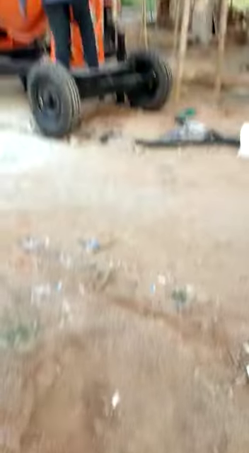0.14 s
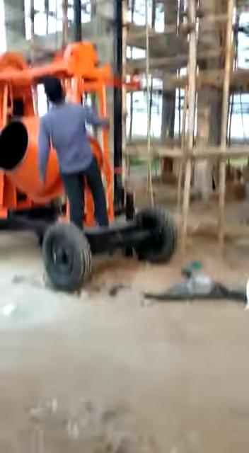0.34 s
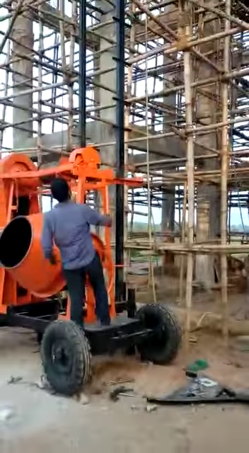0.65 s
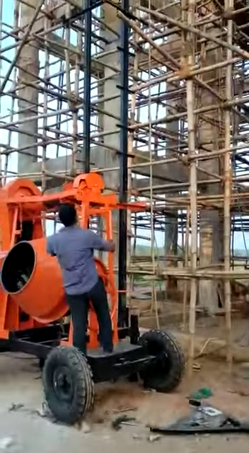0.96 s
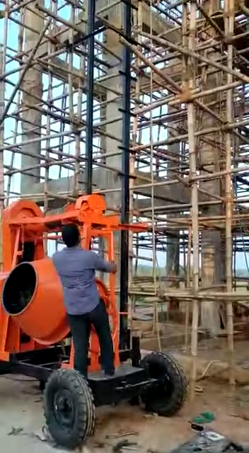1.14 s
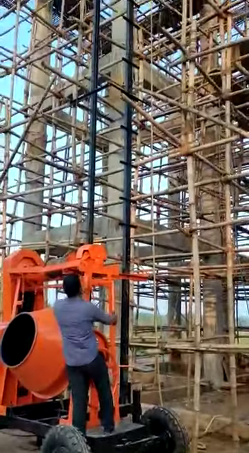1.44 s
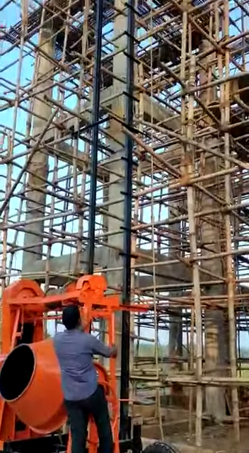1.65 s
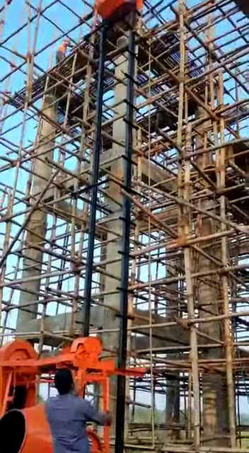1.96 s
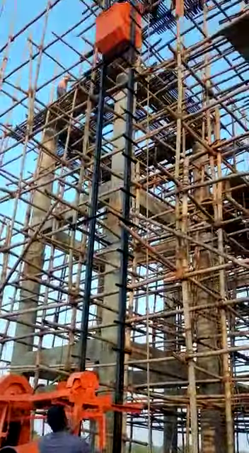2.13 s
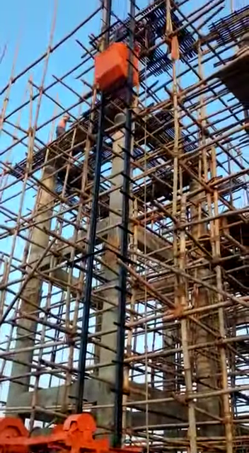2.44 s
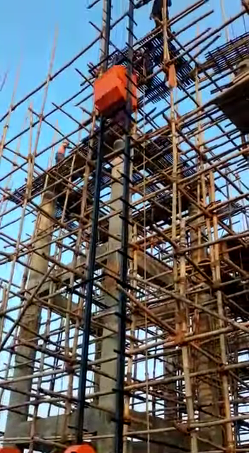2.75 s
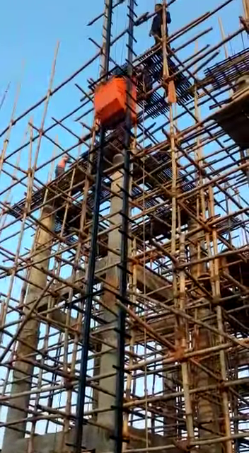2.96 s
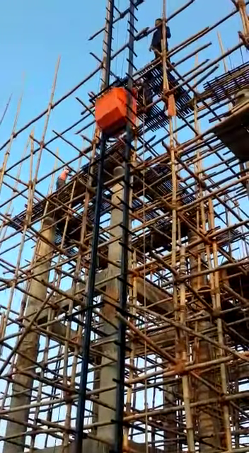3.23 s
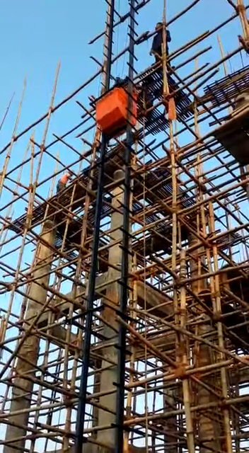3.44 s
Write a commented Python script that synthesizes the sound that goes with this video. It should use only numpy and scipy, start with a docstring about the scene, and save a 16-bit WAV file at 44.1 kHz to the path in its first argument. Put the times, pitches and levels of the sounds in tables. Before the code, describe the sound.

A loud diesel concrete mixer roars and rattles, with metallic clangs and gusts of sliding gravel

```python
"""An open building site on a phone: silence until the microphone switches on at 0.18 s, its offset settling.
From there a single-cylinder diesel drives a concrete mixer with a hoist: firing orders throb low, narrow
noise bands drone as gear teeth, random knocks ring loose steel and broad noise roars behind.
Short noise-fed resonances clang one by one, and grainy hiss slides in the drum in gusts.
Stones tick throughout as short bright noise bursts; four single hits fall near 3 s."""
import sys
import numpy as np
from scipy import signal
from scipy.fft import rfft, irfft
from scipy.io import wavfile
from scipy.ndimage import uniform_filter1d

SR = 44100
rng = np.random.default_rng(int(sys.argv[2]) if len(sys.argv) > 2 else 0)


def store_pcm(level_fs):
    """Save levels as 16-bit WAV."""
    pcm = np.round(np.clip(level_fs, -1, 1) * 32767).astype(np.int16)
    wavfile.write(sys.argv[1], SR, np.atleast_2d(pcm).T)


def convert_level_to_amplitude(level_db):
    """Map a level in decibels to its linear amplitude factor."""
    exponent = np.asarray(level_db, float) / 20
    return 10 ** exponent


N = 158319

# Steady trickle of gravel in the drum, relative levels:
# [t/s, level of the hiss/dB, level of its top band/dB, level of the fizz above/dB]
TRICKLE = [(.4, -31.5, -37.5, -36), (1.08, -32, -27.5, -32), (1.5, -28.5, -27, -33), (1.8, -32, -27.5, -36),
           (3.36, -32, -31.5, -40), (3.5, -30.5, -30, -40)]


def evened(x):
    """Scales to rms 1."""
    return x / np.sqrt(np.mean(x ** 2) + 1e-20)


def curve(table, axis=1):
    """Draws one column of a time table as straight lines, per sample."""
    rows = np.array(table)
    return np.interp(np.arange(N) / SR, rows[:, 0], rows[:, axis])


def colour(x, points):
    """Filters by a spectrum table, interpolated over log frequency, to rms 1."""
    f, db = np.transpose(points)
    hz = np.fft.rfftfreq(N, 1 / SR)
    gain_db = np.interp(np.log(hz + 1), np.log(f + 1), db)
    return evened(irfft(rfft(x) * convert_level_to_amplitude(gain_db), N))


def resonate(x, hz, width_hz):
    """A one-pole resonance that may follow a moving centre, to rms 1."""
    turn = np.exp(2j * np.pi * np.cumsum(hz * np.ones(len(x))) / SR)
    pole = np.exp(-np.pi * width_hz / SR)
    # shift the centre down to 0 Hz, smooth there, shift back
    smooth = signal.lfilter([1 - pole], [1, -pole], x / turn)
    return evened((turn * smooth).real)


def clicks(per_s, spread_db):
    """Random knocks of either sign, a few of them large."""
    size = convert_level_to_amplitude(spread_db * np.minimum(rng.exponential(1, N), 5)) * rng.standard_normal(N)
    return size * (rng.random(N) < per_s / SR)


def random_field(shape, bins, frames):
    """Random rms-1 map over frequency and time, smoothed over so many bins and frames."""
    field = uniform_filter1d(rng.standard_normal(shape), size=bins, axis=0)
    return evened(uniform_filter1d(field, size=frames, axis=1))


def patchy(x, patch_db):
    """Lets patches of time and frequency swell and sink at random."""
    z = signal.stft(x, nperseg=512, noverlap=384)[2]
    gain = convert_level_to_amplitude(patch_db * random_field(z.shape, bins=5, frames=16))
    return evened(signal.istft(z * gain, nperseg=512, noverlap=384)[1][:N])


def steadied(x, share):
    """Irons part of the random swells out of a narrow band, keeping its waver."""
    envelope = np.abs(signal.hilbert(x))
    return evened(x / (envelope + 0.092) ** share)


def exhaust():
    """The exhaust throb: clean low orders of the steady firing rate, each in random phase."""
    # Exhaust orders: [multiple of the firing rate, peak level/dB]
    orders = [(7, -62), (8, -50), (9, -61), (10, -46), (14, -40)]
    firing_hz = 11.93  # one firing every two turns
    t = np.arange(N) / SR
    return sum(convert_level_to_amplitude(db) * np.cos(2 * np.pi * (k * firing_hz * t + rng.random())) for k, db in orders)


def drone():
    """Gear teeth as fuzzy, wavering noise bands; the strongest comes and goes."""
    # Gear tones: [f/Hz, width of the first resonance/Hz, level/dB]
    tones = [(83.6, 16, -46), (165.5, 7.3, -37.5), (246.6, 15, -41.5), (322.3, 19, -46)]
    # Relative course of the strongest tone: [t/s, level/dB]
    main_level = [(0.19, -38), (0.41, -33), (0.44, -47), (1.2, -42), (1.3, -28), (1.35, -51), (1.41, -26),
                  (1.46, -50), (1.63, -33), (1.65, -20.5), (1.84, -82), (1.87, -46), (2.1, -46),
                  (2.16, -34), (2.31, -41), (2.37, -24), (2.4, -57), (3.0, -33), (3.06, -57), (3.2, -39),
                  (3.59, -42.5)]
    low, main, third, fourth = (resonate(resonate(rng.standard_normal(N), hz, width), hz, 2 * width)
                                for hz, width, db in tones)
    gain = convert_level_to_amplitude(np.array(tones)[:, 2])
    main = steadied(main, 0.66) * evened(convert_level_to_amplitude(curve(main_level)))
    return gain @ np.array([low, main, third, fourth])


def clatter():
    """Loose steel: dense knocks ring resonances; the loudest band wanders in pitch."""
    # Rattling steel, relative level: [t/s, level/dB, centre f/Hz]
    rattle = [(0.19, -21.5, 1220), (0.72, -29, 1450), (0.79, -30, 1780), (0.87, -26, 1300),
              (1.21, -29, 1670), (1.29, -24, 1380), (1.9, -35, 1240), (1.98, -22, 1740), (2.05, -20, 1460),
              (2.45, -21, 1720), (2.92, -22.5, 1440), (3.03, -35, 1550), (3.18, -21, 1280),
              (3.49, -20.5, 1430), (3.59, -23, 1310)]
    # Higher rattle bands, relative level: [f/Hz, width of the first resonance/Hz, level/dB]
    chain = [(2530, 1360, 1), (2804, 25, -6), (3016, 100, -2)]
    # Course of the higher rattle: [t/s, level/dB]
    chain_level = [(0.19, -28), (0.3, -23.5), (0.54, -30.5), (1.64, -28), (1.76, -37.5), (2.24, -33),
                   (2.44, -31), (2.88, -38), (2.97, -39), (3.3, -32.5), (3.59, -40)]
    hz = curve(rattle, axis=2)
    low = resonate(resonate(clicks(per_s=2000, spread_db=1.5), hz, width_hz=580), hz, width_hz=1040)
    knocks = clicks(per_s=1200, spread_db=1.2)
    high = sum(convert_level_to_amplitude(db) * resonate(resonate(knocks, f, width), f, 1020) for f, width, db in chain)
    return (convert_level_to_amplitude(curve(rattle) - 4.0) * patchy(low, patch_db=2.5)
            + convert_level_to_amplitude(curve(chain_level)) * patchy(high, patch_db=0.5))


def clangs():
    """Single steel parts: short wavering squeals of noise-fed resonances, some gliding."""
    # Each clang: [start t/s, level/dB, starting f/Hz, length/s, glide/(Hz per s)]
    strikes = [(0.261, -23.5, 1570, 0.04, 2), (0.3172, -24.5, 1390, 0.07, -900),
               (0.335, -26, 2890, .03, -500), (0.6125, -28, 1325, 0.094, 0), (0.7684, -24, 1894, 0.044, 0),
               (0.882, -23.5, 1230, 0.028, 300), (0.9607, -21.5, 1510, 0.033, -1500),
               (1.127, -26, 1680, 0.059, 0), (1.2994, -24, 1460, 0.028, 0), (1.352, -25.5, 1193, 0.038, 0),
               (1.477, -26.5, 1210, 0.038, 0), (1.962, -20.5, 1793, 0.055, -500),
               (2.112, -23.5, 1506, 0.067, 300), (2.112, -25, 1740, 0.044, 800),
               (2.262, -21, 1567, 0.074, -500), (2.534, -26.5, 1320, 0.09, 2200),
               (2.623, -20, 1546, 0.064, -800), (2.682, -20.5, 1450, 0.084, -2000),
               (2.833, -28, 1213, 0.024, 0), (2.9033, -23, 1260, 0.06, -500), (3.15, -20, 1290, 0.034, 3),
               (3.215, -20, 1315, 0.045, 1000), (3.3228, -23.5, 1234, 0.039, 0),
               (3.391, -21, 1420, 0.032, 0), (3.534, -22, 1474, 0.027, 0)]
    rise_s = 0.0024
    out, t = np.zeros(N), np.arange(8000) / SR
    for start, db, hz, length, glide in strikes:
        noise = rng.standard_normal(2 * len(t))
        # the first half only lets the resonance build up
        ring = resonate(resonate(noise, hz, width_hz=57), hz, width_hz=200)[len(t):]
        ring = steadied(ring, 0.78)
        ring = (signal.hilbert(ring) * np.exp(1j * np.pi * glide * t ** 2)).real
        shape = np.minimum(t / rise_s, 1) * np.exp(-(t / length) ** 3)
        part = out[round(start * SR):][:len(t)]  # a view: adding to it adds to out
        part += (convert_level_to_amplitude(db) * shape * ring)[:len(part)]
    return out


def gusts(axis):
    """Gain of a gravel band: the power of the trickle plus every slide, with rise, hold and fall."""
    # Gusts of sliding gravel, relative levels:
    # [start t/s, length/s, level of the hiss/dB, level of its top band/dB]
    slides = [(0.206, 0.18, -29, -37), (0.422, 0.044, -33, -39), (0.606, 0.028, -32, -37),
              (0.705, 0.049, -36, -28.5), (0.768, 0.036, -25.5, -27), (0.838, 0.034, -30.5, -30),
              (1.103, 0.046, -26.5, -33), (1.289, 0.024, -25.5, -23), (1.323, 0.12, -28.5, -29),
              (1.486, 0.05, -30.5, -24), (1.559, 0.15, -30, -23.5), (1.825, 0.053, -24.5, -18.5),
              (1.969, 0.11, -30, -35), (2.064, 0.043, -29, -25.5), (2.17, 0.1, -24, -25),
              (2.35, 0.16, -24.5, -24.5), (2.527, 0.062, -27.5, -32), (2.678, 0.03, -29, -43),
              (2.737, 0.055, -26, -32), (2.917, 0.14, -23, -25.5), (3.065, 0.079, -25.5, -26.5),
              (3.191, 0.039, -27, -31), (3.315, .045, -32.5, -34), (3.37, 0.14, -25, -26),
              (3.562, .04, -27, -26)]
    rise_s, fall_s = 0.012, 0.015
    build_db = 2  # each gust grows by this much over its length
    t, power = np.arange(N) / SR, convert_level_to_amplitude(2 * curve(TRICKLE, axis=axis))
    for row in slides:
        since, length = t - row[0], row[1]
        shape = np.clip(since / rise_s, 0, 1) * np.exp(-np.clip(since - length, 0, 1) / fall_s)
        shape = shape * convert_level_to_amplitude(build_db * np.clip(since / length, 0, 1))
        power = power + (convert_level_to_amplitude(row[axis + 1]) * shape) ** 2
    return np.sqrt(power)


def gravel():
    """Grit sliding on the drum wall: a grainy hiss with faint rings, a top band and a fizz."""
    # Colour of the hiss, relative: [f/Hz, level per Hz/dB]
    hiss_colour = [(1060, -10), (1800, 3), (2240, -1), (2620, 0.5), (3030, -2.5), (3230, -7.5),
                   (3710, -7.5), (4570, -14.5), (5910, -9), (7560, -8), (8060, -11.5), (8750, -10),
                   (10000, -9.5), (11700, -13.5), (15100, -21), (16000, -34)]
    # Rings of the drum wall, relative to the hiss: [f/Hz, width/Hz, level/dB]
    wall_rings = [(5750, 140, -17), (6040, 110, -17), (6450, 120, -17), (8140, 140, -19)]
    grit = evened(clicks(per_s=5000, spread_db=0.5)) + 0.65 * rng.standard_normal(N)
    rings = sum(convert_level_to_amplitude(db) * resonate(grit, f, width) for f, width, db in wall_rings)
    hiss = colour(grit, hiss_colour) + rings
    # reversed and shifted grit keeps the three bands from moving in step
    top = resonate(resonate(grit[::-1], 10950, width_hz=680), 10950, width_hz=3200)
    fizz = resonate(resonate(np.roll(grit, N // 2), 13000, width_hz=3000), 12500, width_hz=4000)
    top_gain = gusts(axis=2)
    # the fizz follows the gusts of the top band more weakly
    fizz_swell = (top_gain / uniform_filter1d(top_gain, size=20000)) ** 0.6
    return (convert_level_to_amplitude(3.5) * gusts(axis=1) * patchy(hiss, patch_db=1.54)
            + convert_level_to_amplitude(-7.5) * top_gain * patchy(top, patch_db=1.1)
            + convert_level_to_amplitude(curve(TRICKLE, axis=3)) * fizz * fizz_swell)


def ticks():
    """Stones strike the drum: short bright bursts, many small ones swelling with the gusts."""
    # Single stones: [t/s, level of the burst envelope/dB]
    stones = [(2.995, -19), (3.014, -19), (3.09, -14), (3.1936, -29)]
    decay_s = 0.003
    hits = convert_level_to_amplitude(-34.5) * evened(gusts(axis=1)) * np.abs(clicks(per_s=72, spread_db=1.9))
    for start, db in stones:
        hits[round(start * SR)] += convert_level_to_amplitude(db)
    shape = signal.oaconvolve(hits, np.exp(-np.arange(2000) / SR / decay_s))[:N]
    return shape * resonate(resonate(rng.standard_normal(N), 5270, 3800), 9400, 5800)


def roar():
    """Engine casing and site: broad noise with patches that swell and sink."""
    # Colour of the roar, relative: [f/Hz, level per Hz/dB]
    roar_colour = [(12, -43), (20, -23), (70, -1.5), (116, -7), (168, 2), (319, -3.5), (472, -10), (660, 1),
                   (1030, 0.5), (1290, 5.5), (1810, -6.5), (2080, -6), (2990, -3.5), (3340, -16.5),
                   (4540, -13), (5850, -15), (7950, -14), (8890, -20), (11100, -29), (14700, -14),
                   (16000, -13)]
    # Course of the roar: [t/s, level/dB]
    roar_level = [(0.19, -45), (0.23, -23), (0.42, -28), (1.46, -23.5), (1.92, -25), (3.59, -23)]
    return convert_level_to_amplitude(curve(roar_level)) * patchy(colour(rng.standard_normal(N), roar_colour), patch_db=2.0)


def thin_bands(x):
    """Random narrow gains, slowly changing, over the whole spectrum: thin bands of the noise swell and fade."""
    z = signal.stft(x, nperseg=4096, noverlap=3072)[2]
    gain = evened(convert_level_to_amplitude(2 * random_field(z.shape, bins=2, frames=6)))  # gain spread 2 dB rms
    return signal.istft(z * gain, nperseg=4096, noverlap=3072)[1][:N]


def scene():
    """All sources reach one microphone, alike on both channels."""
    noisy = thin_bands(roar() + clatter() + gravel())
    mono = exhaust() + drone() + clangs() + ticks() + noisy
    return np.array([mono, mono])


def top_cut(x):
    """Nothing passes above the cut-off."""
    return signal.sosfilt(signal.butter(12, 16280, fs=SR, output="sos"), x)


def record(dry):
    """The phone: microphone dip, soft overload, band limit, settling offset and switch-on."""
    # Offset after switch-on, two decays: [height, time constant/s]
    settle = [(0.088, 0.083), (-0.052, 0.41)]
    on_s, on_rise_s = 0.1838, 0.0011
    ceiling = 0.55  # the input bends softly towards this peak
    t = np.maximum(np.arange(N) / SR - on_s, 0)  # time since switch-on
    offset = sum(height * np.exp(-t / tau) for height, tau in settle)
    hz = np.fft.rfftfreq(N, 1 / SR)
    dip_db = -3 * np.exp(-((hz - 4586) / 240) ** 2)
    heard = irfft(rfft(dry) * convert_level_to_amplitude(dip_db), N)
    bent = ceiling * np.tanh(heard / ceiling)
    lowpass = signal.firwin(1023, 15740, window=("kaiser", 9), fs=SR)
    limited = signal.oaconvolve(bent, lowpass[None], "same")
    switched = (limited + offset) * np.minimum(t / on_rise_s, 1)
    return top_cut(switched)


dry = scene()
out = record(dry)
store_pcm(out)
```